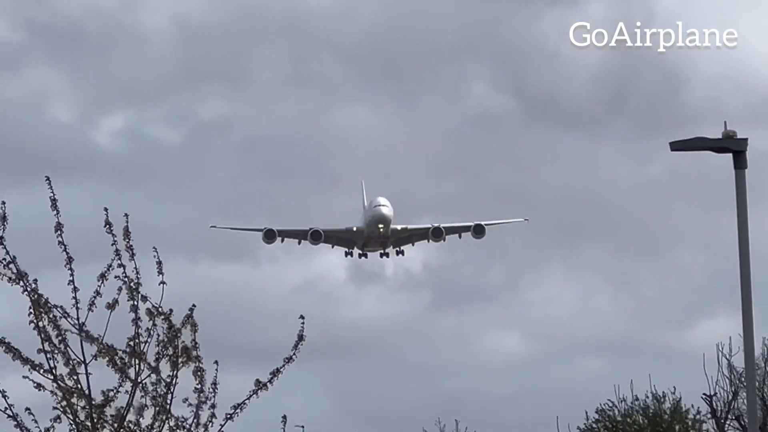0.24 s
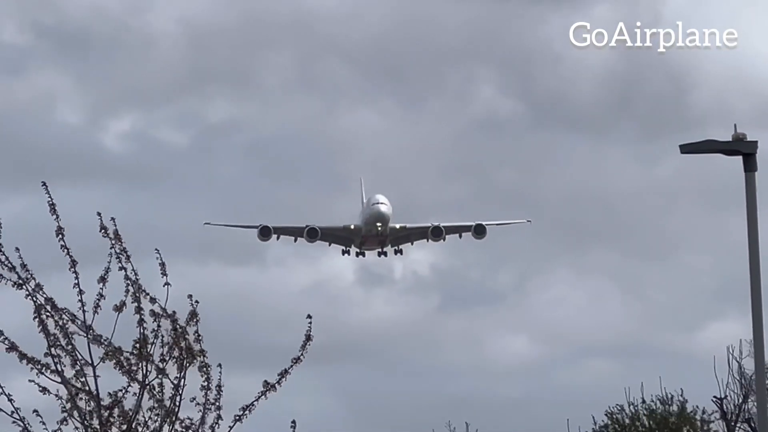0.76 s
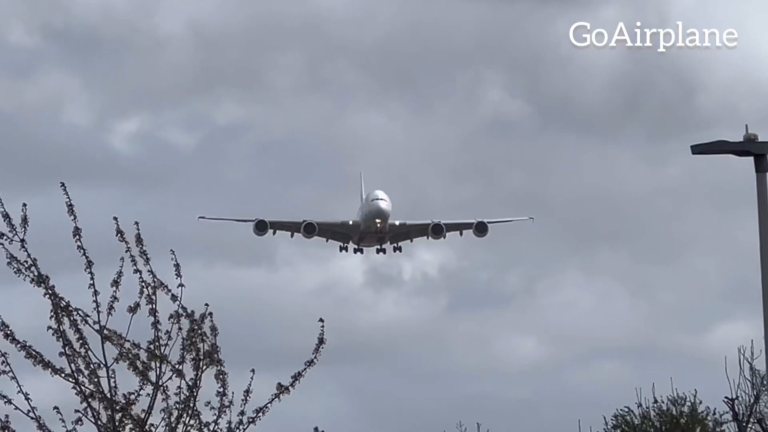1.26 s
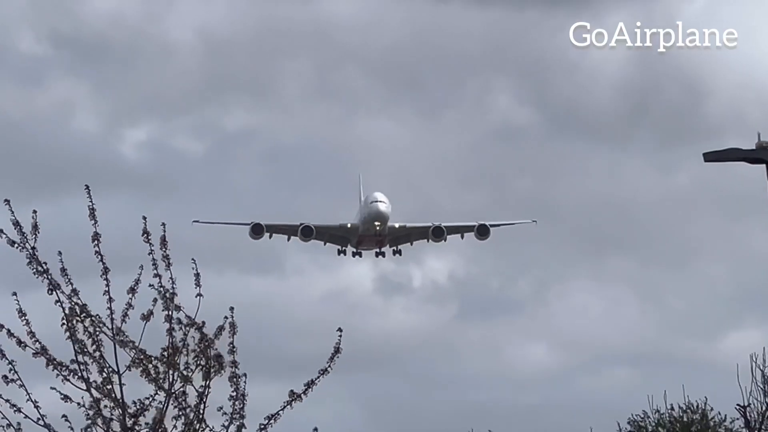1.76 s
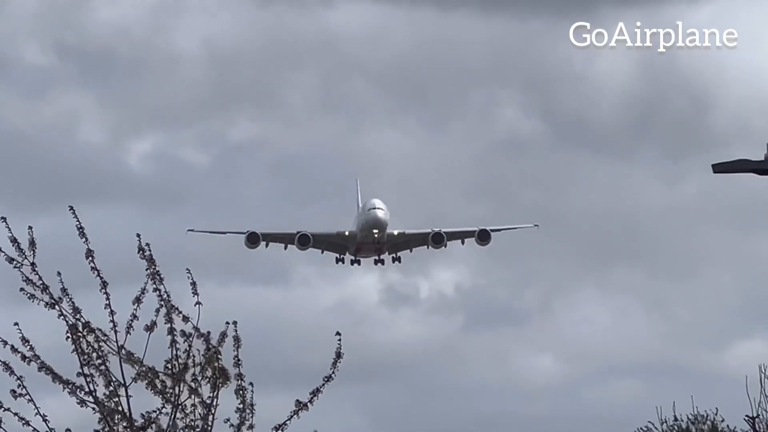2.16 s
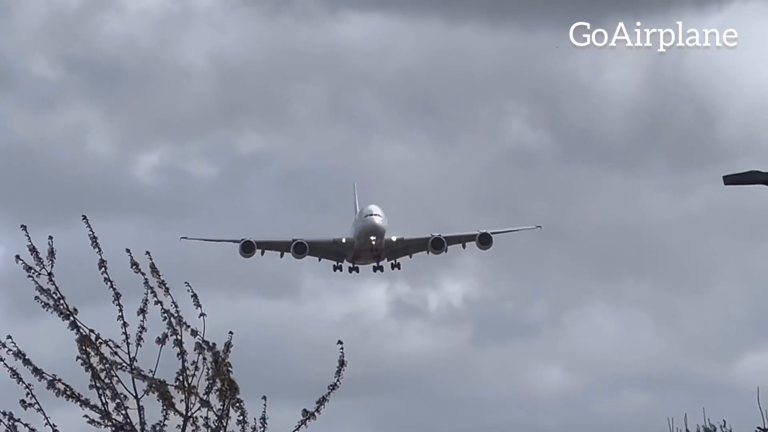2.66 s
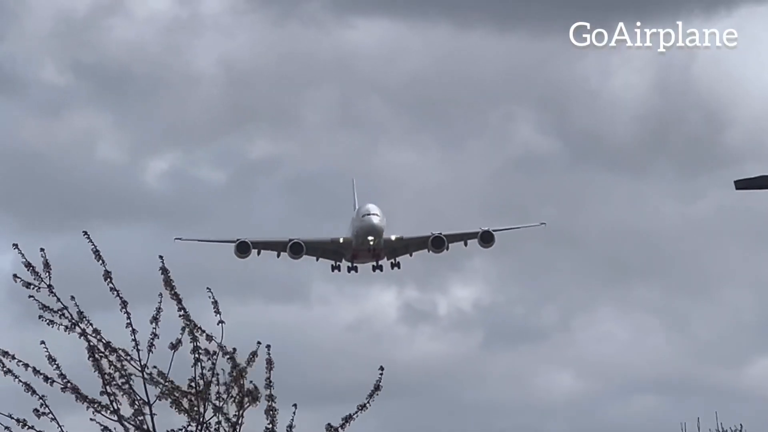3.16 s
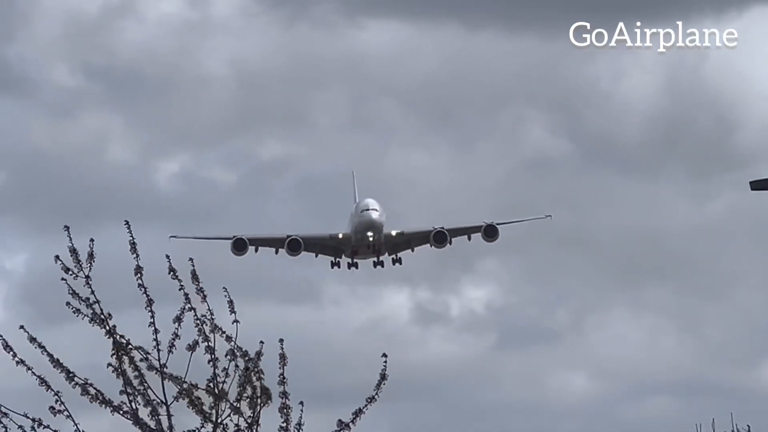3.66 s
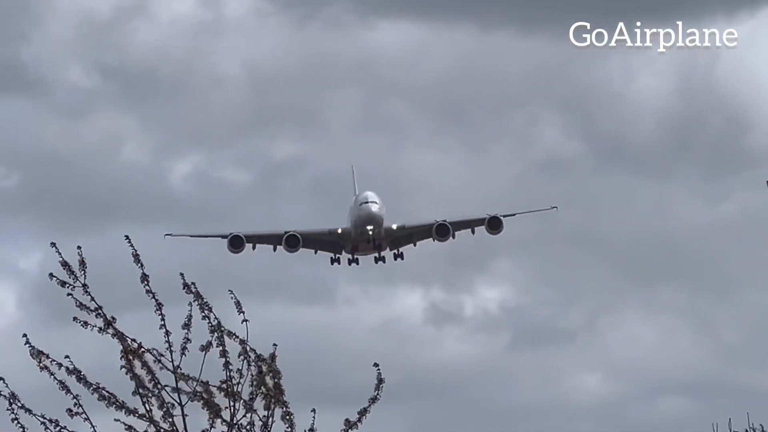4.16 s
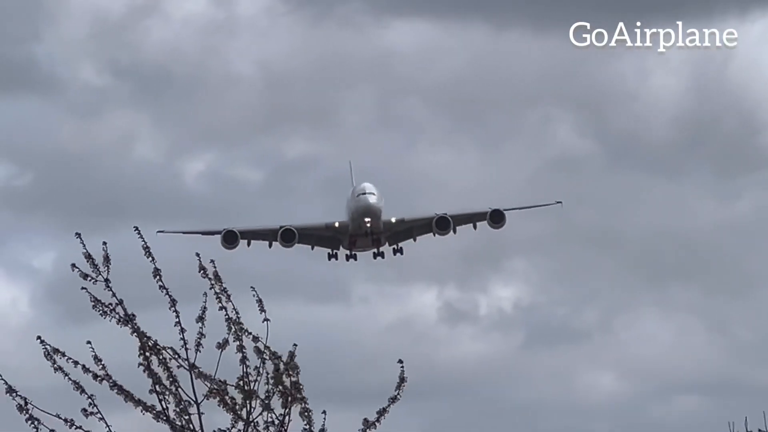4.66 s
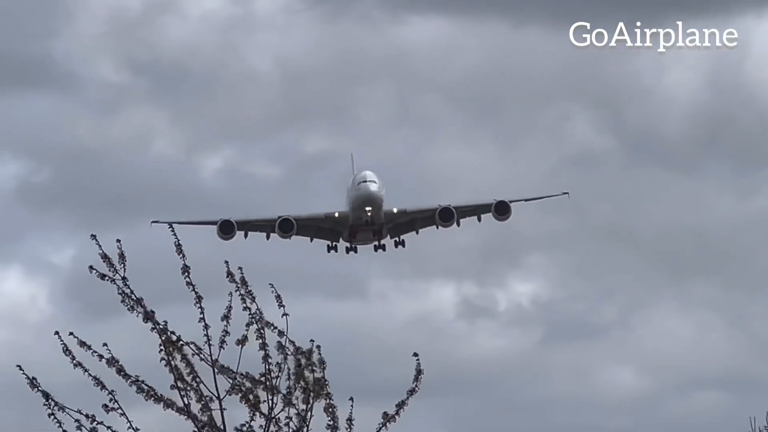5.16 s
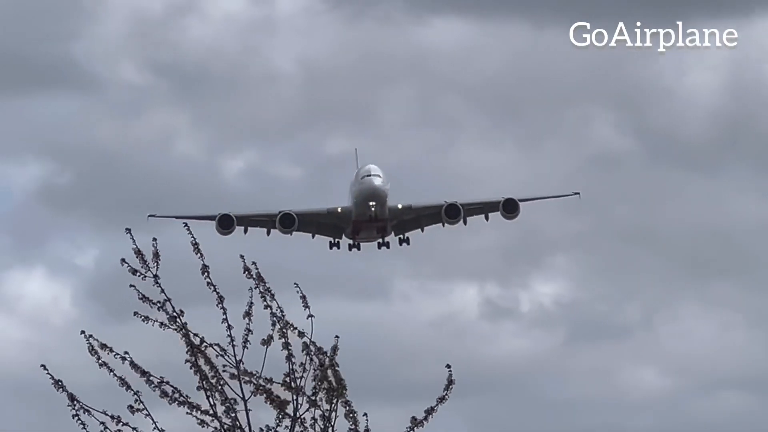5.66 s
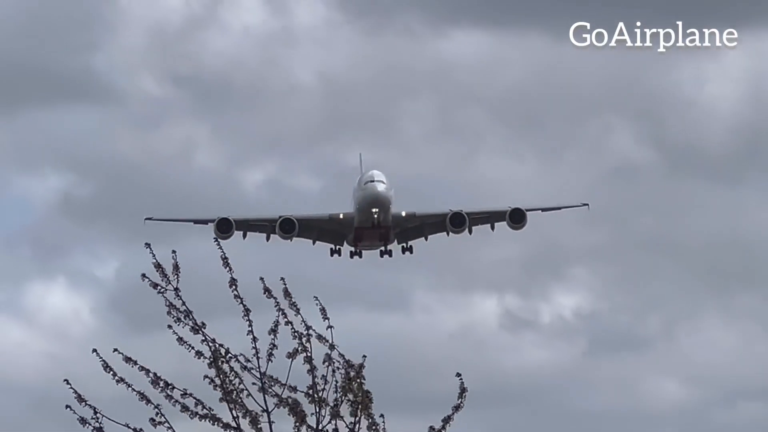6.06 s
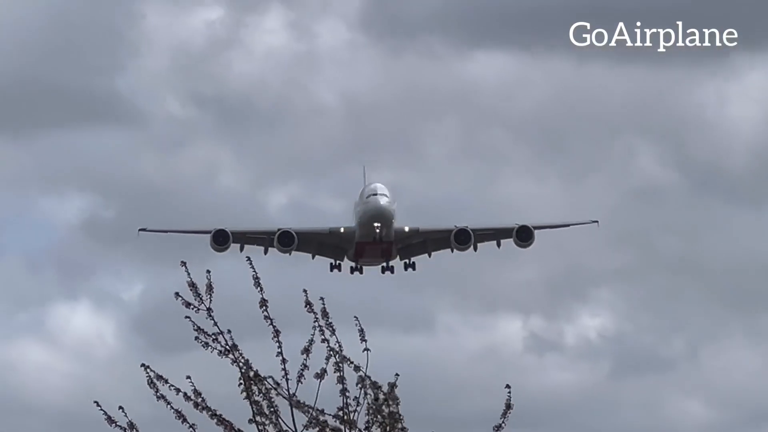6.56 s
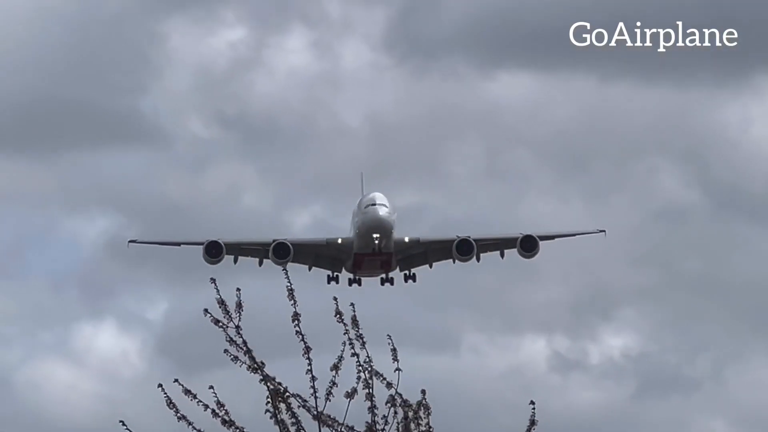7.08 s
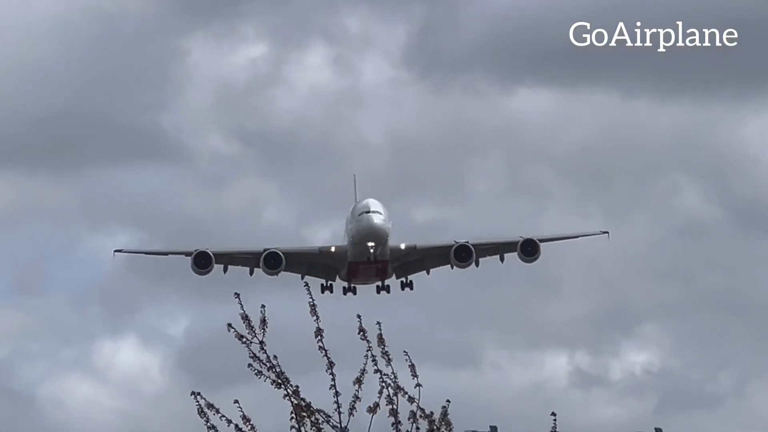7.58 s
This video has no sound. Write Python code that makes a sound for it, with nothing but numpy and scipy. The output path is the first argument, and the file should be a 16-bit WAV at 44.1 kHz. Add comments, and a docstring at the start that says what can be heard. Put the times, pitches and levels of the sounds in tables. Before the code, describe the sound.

Outdoor roadside: broad airliner roar with faint fan whine, two nearby car passes from the right, then heavy wind buffeting and farther traffic.

```python
"""Airliner over a gusty roadside

Jets are a distant rush of shaped noise that swells and sinks, with a fan band that comes and goes.
Two near cars sweep from the right to just past centre, as tyre noise and body hum placed by the lag
between two microphones; farther traffic follows. Wind buffets the microphones: lumpy low noise,
short swinging thumps and puffs. A few faint ticks."""
import sys
import numpy as np
from scipy import signal
from scipy.fft import rfft, irfft, next_fast_len
from scipy.io import wavfile

SR = 44100
rng = np.random.default_rng(int(sys.argv[2]) if len(sys.argv) > 2 else 0)


def wav_record(signal):
    """Record a signal, one row per channel, as 16-bit PCM in the file named by sys.argv[1]."""
    frames = np.transpose(np.atleast_2d(signal))
    bounded = np.clip(frames, -1, 1)
    # unit amplitude maps onto the largest positive 16-bit level
    quanta = np.round(bounded * 32767).astype(np.int16)
    wavfile.write(sys.argv[1], SR, quanta)


N = 344890

# tyre hiss spectrum: f/Hz, density/dB per Hz
TYRE_HISS = [(3500, -1.5), (4500, -8.5), (6000, -9.5), (7500, -8), (8800, -13.5), (11500, -16.5),
             (13000, -17), (15500, -22.5)]


def from_db(db):
    """Gain of a level in dB."""
    return 10 ** (np.asarray(db) / 20)


def rms_one(x):
    """Scale to unit rms."""
    return x / np.sqrt(np.mean(x ** 2) + 1e-20)


def in_time(rows):
    """Interpolate each column after t/s to one value per sample."""
    s, *columns = np.transpose(rows)
    return [np.interp(np.arange(N) / SR, s, c) for c in columns]


def sounding(rows, fade_s):
    """Gate open over a table's time span, with linear fades outside it."""
    start_s, end_s = rows[0][0], rows[-1][0]
    return in_time([(start_s - fade_s, 0), (start_s, 1), (end_s, 1), (end_s + fade_s, 0)])[0]


def coloured(x, spectrum):
    """Filter by f/Hz, gain/dB, interpolated over log frequency."""
    size = next_fast_len(N)
    hz = np.maximum(np.arange(size // 2 + 1) * SR / size, 1)
    points = np.array(spectrum)
    gain_db = np.interp(np.log(hz), np.log(points[:, 0]), points[:, 1])
    return irfft(rfft(x, size) * from_db(gain_db), size)[..., :N]


def noise(spectrum, channels=1):
    """Unit-rms noise of a given colour, 60 dB down an octave beyond each end."""
    (low_hz, low_db), (high_hz, high_db) = spectrum[0], spectrum[-1]
    closed = [(low_hz / 2, low_db - 60)] + list(spectrum) + [(high_hz * 2, high_db - 60)]
    return rms_one(coloured(rng.standard_normal((channels, N)), closed))


def drift(rate_hz):
    """Slow chance, spread 1: noise at every 40th sample through a double one-pole low-pass."""
    r = np.exp(-80 * np.pi * rate_hz / SR)
    start = rng.standard_normal(N // 40 + 2002)
    slow = signal.lfilter([1], [1, -2 * r, r * r], start)[2000:]  # drop the filter's onset
    return np.interp(np.arange(N) / 40, np.arange(len(slow)), rms_one(slow))


def placed(sound, lag_ms, scattered):
    """Left lags right by lag_ms; a share of the power is stray sound of opposite sign on the two sides."""
    direct, stray = sound
    read_at = np.arange(N) - lag_ms * SR / 2000 * np.array([[1], [-1]])
    sides = np.interp(read_at, np.arange(N), direct)
    share = np.clip(scattered, 0, 1)
    return np.sqrt(1 - share) * sides + np.sqrt(share) * stray * [[1], [-1]]


def shifted(pair, factor):
    """Reading noise faster or slower moves its whole colour up or down."""
    read_at = np.cumsum(factor)
    return np.array([np.interp(read_at % (N - 1), np.arange(N), v) for v in pair])


def glide(before, after, at_s, width_s):
    """Smooth tanh step from one value to another."""
    return after + (before - after) * (1 - np.tanh((np.arange(N) / SR - at_s) / width_s)) / 2


def jets():
    """Broad far-off rush that swells and sinks, and a fan band that comes and goes."""
    # jet levels: t/s, rush level/dB, fan level/dB
    levels = [(0, -36.5, -66), (1, -33.5, -51), (3, -32.5, -46), (3.7, -38, -45), (4.05, -35, -47),
              (4.25, -30, -42.5), (4.6, -33.5, -49), (5.2, -30.5, -51.5), (5.8, -33, -50.5),
              (6.3, -30, -50), (6.8, -30.5, -57), (7.1, -30.5, -52), (7.82, -31.5, -70)]
    # spectra of rush and broad fan whine: f/Hz, density/dB per Hz
    rush_colour = [(40, -5), (110, -1.5), (200, -4), (300, -8.5), (400, -13), (800, -2), (1500, -12),
                   (2000, -14), (2600, -16), (3500, -25.5), (5000, -34.5), (8000, -40), (11500, -50),
                   (15500, -52.5)]
    fan_colour = [(2200, -15), (2500, -3), (3200, -2.5), (3600, -11.5), (4500, -13)]
    rush_db, fan_db = in_time(levels)
    rush = from_db(rush_db + 0.3 * drift(27)) * noise(rush_colour, channels=2)
    fans = from_db(fan_db + 1.4 * drift(8)) * noise(fan_colour, channels=2)
    return placed(rush + fans, 0, scattered=0.51)


def wind():
    """Eddies tumble over the ports: lumpy low noise, partly own to each side, under single thumps."""
    # wind strength as rumble: t/s, level/dB
    strength = [(0.0, -33), (0.16, -43), (0.22, -38), (0.3, -46), (0.55, -43), (0.9, -42.5), (1.6, -43.5),
                (2.6, -40), (3.5, -36), (3.62, -31), (3.95, -29), (4.25, -31), (4.42, -30), (4.47, -31),
                (4.6, -27.5), (4.68, -26), (4.93, -25), (4.97, -33), (5.05, -28.5), (5.33, -28),
                (5.45, -32), (5.58, -28.5), (5.85, -29.5), (6.1, -28.5), (6.33, -33.5), (6.5, -27),
                (6.8, -28.5), (6.97, -38), (7.05, -28), (7.15, -33), (7.45, -35), (7.82, -38)]
    # strong eddies: t/s, level/dB, f/Hz
    strong_eddies = [(0.047, -21, 95), (0.095, -31, 130), (0.112, -19, 200), (0.123, -18, 75),
                     (0.208, -13, 215), (0.222, -18, 110), (0.246, -20, 155), (0.353, -26.5, 60),
                     (0.47, -22, 105), (0.499, -24, 130), (0.587, -21, 120), (0.627, -31, 115),
                     (0.702, -26, 230), (0.734, -23, 195), (0.835, -29, 80), (0.983, -27, 90),
                     (1.36, -27, 80), (1.776, -28, 75), (2.051, -22, 80), (2.351, -14, 110),
                     (2.571, -23, 100), (2.82, -22, 95), (2.887, -24, 90), (3.12, -26, 80), (3.25, -22, 80),
                     (3.587, -21, 195), (3.613, -24, 90), (3.668, -19, 180), (3.686, -17, 70),
                     (3.734, -13, 195), (3.755, -16, 60), (3.793, -19, 75), (3.885, -19, 70),
                     (4.055, -16, 70), (4.089, -11.5, 95), (4.136, -10.5, 180), (4.165, -16, 80),
                     (4.214, -13.5, 70), (4.25, -7, 105), (4.279, -10, 80), (4.348, -13.5, 90),
                     (4.402, -6.5, 90), (4.678, -6, 170), (4.71, -5, 90), (4.751, -18, 170),
                     (4.789, -16, 130), (4.829, -14, 115), (4.854, -15, 75), (4.879, -13, 60),
                     (4.922, -7.5, 145), (5.246, -20, 180), (5.296, -11, 250), (5.323, -12.5, 130),
                     (5.372, -20, 75), (5.542, -15, 120), (5.579, -15, 90), (5.738, -14, 155),
                     (5.771, -10, 75), (5.816, -12, 75), (5.868, -7, 90), (5.947, -15, 115),
                     (6.001, -15, 105), (6.045, -9, 215), (6.093, -19, 60), (6.123, -17, 60),
                     (6.167, -13.5, 240), (6.232, -22, 120), (6.404, -18, 130), (6.491, -6.5, 90),
                     (6.568, -10.5, 80), (6.6, -17, 95), (6.63, -11.5, 75), (6.677, -12, 70),
                     (6.733, -15, 90), (6.843, -12, 145), (6.889, -14, 90), (6.955, -12.5, 170),
                     (7.017, -11, 115), (7.047, -10, 95), (7.091, -18, 115), (7.115, -16, 110),
                     (7.224, -17, 75), (7.351, -17, 75), (7.384, -17, 155), (7.423, -25, 105),
                     (7.474, -28, 80), (7.528, -25, 70), (7.697, -32, 80), (7.747, -24, 95)]
    # spectra of rumble and brighter buffeting: f/Hz, density/dB per Hz
    rumble_colour = [(12, -45), (20, -17), (60, 3.5), (78, 0.5), (140, -8), (180, -37), (310, -120)]
    buffet_colour = [(90, -7), (140, -1), (250, 2), (400, -3.5), (900, -13)]
    # centre of the buffeting: t/s, f/Hz
    reach = [(0, 300.1), (0.3, 240), (0.6, 230), (3.4, 200.2), (4.5, 190.1), (4.95, 179.8), (5.1, 290.4),
             (5.5, 250.1), (6.3, 230.1), (6.6, 319.8), (6.8, 179.9), (7.82, 159.9)]
    stir_db, stir_s = -22.5, 0.022  # noise around a strong eddy, relative to it; half-width
    mean_buffet_db, buffet_centre_hz = -34.5, 250

    rumble_db = in_time(strength)[0]
    t = np.arange(0, N, 40) / SR
    stirred = sum(from_db(db + stir_db) * np.exp(-((t - s) / stir_s) ** 2) for s, db, hz in strong_eddies)
    stirred = np.interp(np.arange(N) / SR, t, stirred)
    lumps_db = 1.6 * drift(10.4)
    rumble = (from_db(rumble_db) + stirred) * from_db(lumps_db) * noise(rumble_colour, channels=2)

    buffet_db = mean_buffet_db + rumble_db - rumble_db.mean()
    airy = shifted(noise(buffet_colour, channels=2), in_time(reach)[0] / buffet_centre_hz)
    flutter_db = lumps_db + 2.2 * drift(44)
    buffet = (from_db(buffet_db) + 0.67 * stirred) * from_db(flutter_db) * airy

    low = placed(rumble, 0.12, scattered=0.39) + placed(buffet, 0.071, scattered=0.27)
    return low + thumps(strong_eddies) + thumps(small_eddies(rumble_db))


def thumps(rows):
    """Each eddy pushes the membrane through a swing or two; how it lands is chance."""
    mean_lead_turns, skew_turns, width_turns = 0.058, 0.4, 0.46
    out = np.zeros((2, N))
    chance = rng.random((len(rows), 2))
    for (s, level_db, hz), (start, skew) in zip(rows, chance):
        half = int(1.5 * SR / hz)
        turns = np.arange(-half, half) * hz / SR
        lead = mean_lead_turns + skew_turns * (skew - .5)  # positive: right ahead
        phase = turns + start + lead * np.array([[-.5], [.5]])
        push = np.sin(2 * np.pi * phase) * np.exp(-(turns / width_turns) ** 2)
        at = round(s * SR) - len(turns) // 2
        out[:, at:at + len(turns)] += from_db(level_db) * push
    return out


def small_eddies(rumble_db):
    """Rows of t/s, level/dB, f/Hz at random gaps, following the wind's strength."""
    eddies_per_s, over_rumble_db, spread_db = 24, 6, 5
    low_hz, high_hz = 80, 260
    gap, size, pitch = rng.random((300, 3)).T
    s = .05 + np.cumsum(-np.log(1 - gap)) / eddies_per_s  # exponential gaps
    keep = s < N / SR - .05
    wind_db = rumble_db[(s[keep] * SR).astype(int)]
    level_db = wind_db + over_rumble_db + spread_db * (2 * size[keep] - 1)
    return np.transpose([s[keep], level_db, low_hz * (high_hz / low_hz) ** pitch[keep]])


def near_car(car, tyre_rows, hum_rows):
    """Tyre roar whose centre climbs as the car goes by, tread swish and hiss above it, a low body hum."""
    # spectra of roar, swish and hum: f/Hz, density/dB per Hz
    roar_colour = [(300, -6.5), (400, -5), (520, -4), (700, -3.5), (780, -0.5), (860, 4), (960, 3),
                   (1060, 0.5), (1180, -1.5), (1300, -1.5), (1500, -6), (1800, -15), (2400, -51)]
    swish_colour = [(1400, 3), (1700, 3.5), (1950, 0), (2250, -3), (2700, -6), (3300, -11.5), (4200, -21),
                    (5800, -25.5)]
    hum_colour = [(95, -33), (125, -12.5), (165, -7.5), (185, -4.5), (200, -0.5), (215, -3.5), (230, -4.5),
                  (260, -4), (290, -10), (330, -12), (450, -11.5)]
    coming_hz, gone_hz, turn_s, turn_after_s = 929.6, 1042, .2, .12  # roar centre about the pass
    right_ms, past_ms, sweep_s, sweep_lead_s = .6, -.04, .35, .25  # lag of left behind right
    rise_db_per_s, fall_db_per_s, hiss_sag_per_ms = 25, 13.5, .3
    roar_centre_hz, hum_centre_hz = 1000, 200

    pass_s, hiss_s, hiss_peak_db, hold_s = car
    t = np.arange(N) / SR
    roar_db, swish_db = in_time(tyre_rows)
    hum_hz, hum_db = in_time(hum_rows)
    centre_hz = glide(coming_hz, gone_hz, pass_s + turn_after_s, turn_s)
    lag_ms = glide(right_ms, past_ms, pass_s - sweep_lead_s, sweep_s)

    roar_noise = shifted(noise(roar_colour, channels=2), centre_hz / roar_centre_hz)
    roar = from_db(roar_db + 1.2 * drift(9)) * roar_noise
    hum_noise = shifted(noise(hum_colour, channels=2), hum_hz / hum_centre_hz)
    hum = from_db(hum_db + 1.5 * drift(8.1)) * hum_noise
    # swish and hiss are duller while the car is off to the right
    swish_noise = shifted(noise(swish_colour, channels=2), 1 - .08 * lag_ms)
    swish = from_db(swish_db + 0.77 * drift(14.0)) * swish_noise
    rise_db = hiss_peak_db - rise_db_per_s * np.maximum(hiss_s - hold_s - t, 0)
    hiss_db = rise_db - fall_db_per_s * np.maximum(t - hiss_s - hold_s, 0)
    hiss_noise = shifted(noise(TYRE_HISS, channels=2), 1 - hiss_sag_per_ms * lag_ms)
    hiss = from_db(hiss_db + 1.3 * drift(25)) * hiss_noise

    low = placed(roar, lag_ms, scattered=0.072) + placed(hum, lag_ms, scattered=0.089)
    high = placed(swish, 0.23 * lag_ms, scattered=0.06) + placed(hiss, 0, scattered=0.41)
    return sounding(tyre_rows, .3) * (low + high)


def near_cars():
    """Two cars pass close by, one after the other."""
    # one row per car: pass t/s, hiss peak t/s, hiss peak level/dB, hiss hold each side/s
    passes = [(1.749, 1.545, -43, 0.067), (2.799, 2.82, -43.5, 0.17)]
    # tyre noise, one table per car: t/s, roar level/dB, swish level/dB
    tyre_levels = [
        [(0.0, -33, -41.5), (0.5, -36.5, -42), (0.7, -33, -37.5), (0.95, -31.5, -34), (1.3, -25.5, -32.5),
         (1.65, -22.5, -29.5), (1.85, -21.5, -26.5), (2.03, -22.5, -30), (2.2, -22.5, -32), (2.34, -25.5, -34),
         (2.45, -30.5, -36), (3.04, -52, -56)],
        [(2.0, -30, -77), (2.45, -23.5, -35.5), (2.81, -19.5, -32.5), (3.17, -24, -32), (3.4, -25, -37),
         (3.9, -28, -37), (4.25, -28.5, -42.5), (4.61, -30.5, -65), (5.21, -47, -60)],
    ]
    # body hum, one table per car: t/s, f/Hz, level/dB
    hums = [
        [(0.3, 340, -50), (0.9, 320, -39), (1.03, 284.8, -30.5), (1.15, 255.8, -33), (1.3, 229.4, -28),
         (1.45, 212, -31.5), (1.7, 205.2, -24.5), (2.0, 200.2, -29), (2.3, 184.8, -29.5), (2.9, 180, -50)],
        [(2.1, 240.2, -37), (2.5, 200, -29), (2.8, 205, -26.5), (3.05, 205.2, -28), (3.3, 184.9, -31),
         (3.8, 179.9, -37), (4.6, 180.4, -42)],
    ]
    return sum(near_car(*car) for car in zip(passes, tyre_levels, hums))


def distant_hiss():
    """Faint tyre hiss of cars already gone by or still to come."""
    # hiss from along the road: t/s, level/dB
    levels = [(0, -58.5), (1, -58.5), (3, -62), (6.3, -63.5), (7.82, -59)]
    return placed(from_db(in_time(levels)[0]) * noise(TYRE_HISS, channels=2), 0, scattered=0.22)


def tread_bands():
    """Narrow wavering bands of tyre noise that drift in pitch."""
    # one table per band: t/s, centre f/Hz, level/dB
    bands = [
        [(0.3, 1005, -49), (0.7, 1047, -45), (1.2, 1078, -36.5), (1.6, 1199, -34), (2.0, 1302, -29),
         (2.3, 1302, -31.5), (2.6, 1305, -40)],
        [(2.5, 1252, -47), (2.8, 1298, -34), (3.1, 1319, -30), (3.4, 1249, -33), (3.8, 1199, -34),
         (4.4, 1201, -37), (4.8, 1207, -49)],
        [(2.3, 564, -44), (2.7, 519, -36), (3.0, 420.3, -34.5), (3.25, 398, -36.5), (3.5, 399, -47)],
        [(4.8, 722, -46), (5.15, 731, -36), (5.4, 703, -38), (5.65, 740.6, -33), (5.8, 717, -35),
         (5.95, 712, -36), (6.2, 719, -44), (6.5, 724, -41), (6.9, 700, -49)],
        [(5.3, 898, -49), (5.7, 930, -34), (5.95, 960, -40), (6.2, 1005, -31.5), (6.55, 1000, -40),
         (7.0, 950, -44), (7.4, 900, -52)],
        [(1.6, 1600, -49), (1.9, 1698, -36), (2.25, 1753, -35), (2.5, 1749, -48)],
        [(2.9, 2404, -56), (3.1, 2495, -41), (3.3, 2500, -59)],
    ]
    # band spectrum around 1000 Hz: f/Hz, density/dB per Hz
    shape = [(760, -22.5), (890, -2.5), (1000, -0.5), (1120, -5), (1300, -21.5)]
    out, narrow = 0, noise(shape, channels=2)
    for rows in bands:
        hz, level_db = in_time(rows)
        gain = sounding(rows, .1) * from_db(level_db + 1.7 * drift(5.7))
        out = out + gain * shifted(narrow, hz / 1000)
    return placed(out, 0, scattered=0.09)


def ticks():
    """Short bright clicks: decaying noise above 5 kHz, alike on both sides."""
    # faint ticks close by: t/s, level/dB before the high-pass
    hits = [(1.421, -35), (2.0233, -42), (5.4475, -43), (7.6181, -54)]
    clicks = np.zeros(N)
    for s, level_db in hits:
        burst = rng.standard_normal(130) * np.exp(-np.arange(130) / 35)
        at = round(s * SR)
        clicks[at:at + 130] = from_db(level_db) * burst
    return signal.sosfilt(signal.butter(2, 5000, "high", fs=SR, output="sos"), clicks)


def far_traffic():
    """Duller tyre roar from farther along the road, fluttering slightly in level."""
    # farther traffic: t/s, roar level/dB
    levels = [(4.7, -36.5), (4.88, -28.5), (5.48, -25.5), (5.78, -26), (6.0, -26.5), (6.25, -26.5),
              (6.48, -24.5), (6.65, -25.5), (6.83, -29), (7.05, -29), (7.36, -30.5), (7.45, -41),
              (7.8, -40.5)]
    # far roar spectrum: f/Hz, density/dB per Hz
    roar_colour = [(190, -21), (330, -9), (516, -4.5), (653, -2.5), (714, -1.5), (1020, 0.5), (1410, -3),
                   (1960, -12.5), (2300, -23.5), (2990, -65), (5060, -120)]
    arrives_db_per_s, lag_ms = 14, -0.2
    early_s = np.maximum(levels[0][0] - np.arange(N) / SR, 0)
    level_db = in_time(levels)[0] - arrives_db_per_s * early_s + 1.4 * drift(20)
    return placed(from_db(level_db) * noise(roar_colour, channels=2), lag_ms, scattered=0.09)


def puffs():
    """Sharp puffs of air on the ports: noise bursts with abrupt onset and exponential decay."""
    # puffs: t/s, envelope level/dB before the low-pass
    hits = [(5.177, -16.5), (5.692, -16), (5.755, -21), (5.87, -20), (6.485, -16), (6.659, -19),
            (6.829, -14.5), (7.04, -17), (7.389, -18)]
    # puff spectrum: f/Hz, density/dB per Hz
    colour = [(300, -11), (700, 11), (1100, -1), (1800, -33)]
    decay_s = 0.0046
    kicks = np.zeros(N)
    kicks[[round(s * SR) for s, db in hits]] = from_db(np.array(hits)[:, 1])
    envelope = signal.lfilter([1], [1, -np.exp(-1 / (decay_s * SR))], kicks + 1e-18)
    bursts = envelope * noise(colour, channels=2)
    soft = signal.sosfilt(signal.butter(4, 1600, fs=SR, output="sos"), bursts)
    return placed(soft, -0.078, scattered=0.072)


def scene():
    """Everything at the two microphones."""
    road = near_cars() + distant_hiss() + tread_bands() + far_traffic()
    return jets() + wind() + road + ticks() + puffs()


def record(dry):
    """Round peaks, shape centre and width by frequency, narrow the bass late, cut both ends."""
    # gain of the centre, dipping near 10 kHz: f/Hz, gain/dB
    mid_colour = [(9000, 0), (9300, -28), (10850, -28), (11100, 0)]
    # gain of the side signal, the image width: f/Hz, gain/dB
    side_colour = [(1200, -3), (1600, -11.5), (2200, -31.5), (3200, -15), (4500, -31), (6800, -53),
                   (8000, -2.5), (10500, 3.5), (12000, 2), (15000, -13.5)]
    # bass draws in to the centre: t/s, share/0-1
    narrowing = [(6.6, 0), (6.72, .93), (7.1, 1)]
    overload_at, narrow_below_hz = .5, 246  # full-scale height that peaks round towards
    dry = overload_at * np.tanh(dry / overload_at)
    mid = coloured((dry[0] + dry[1]) / 2, mid_colour)
    side = coloured((dry[0] - dry[1]) / 2, side_colour)
    thin = signal.sosfiltfilt(signal.butter(4, narrow_below_hz, "high", fs=SR, output="sos"), side)
    side = side + in_time(narrowing)[0] * (thin - side)
    bottom = signal.butter(3, 36, "high", fs=SR, output="sos")
    top = signal.ellip(10, .5, 70, 15700, fs=SR, output="sos")
    return signal.sosfilt(np.vstack([bottom, top]), np.array([mid + side, mid - side]))


dry = scene()
out = record(dry)
wav_record(out)
```